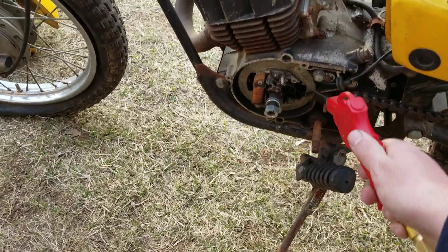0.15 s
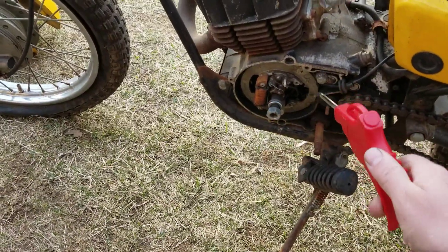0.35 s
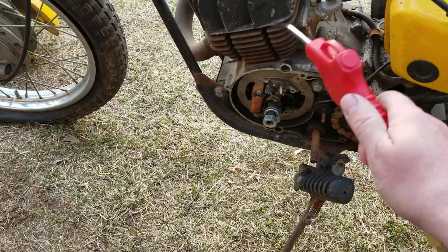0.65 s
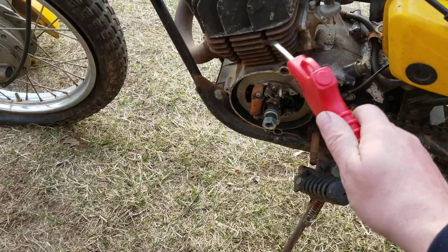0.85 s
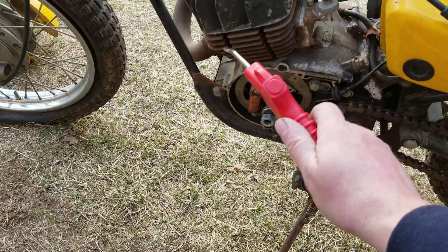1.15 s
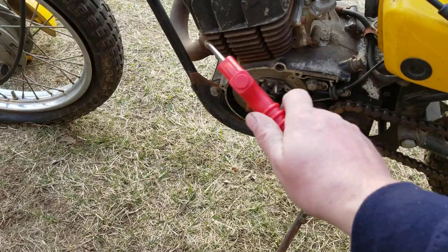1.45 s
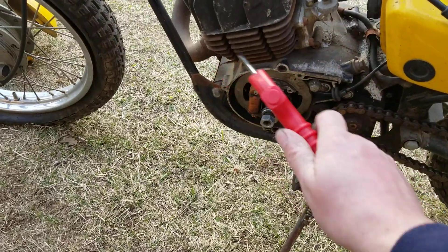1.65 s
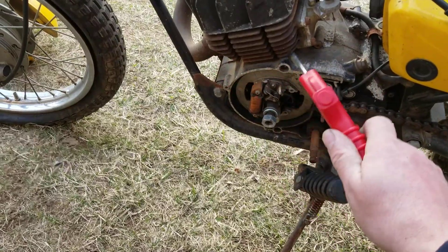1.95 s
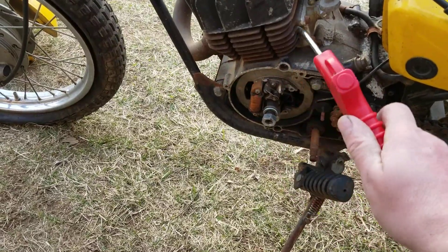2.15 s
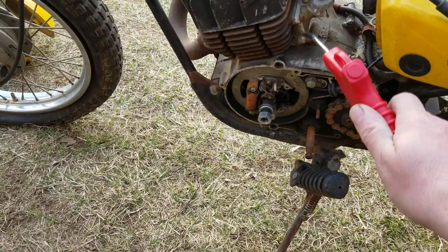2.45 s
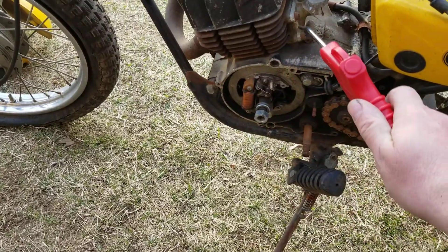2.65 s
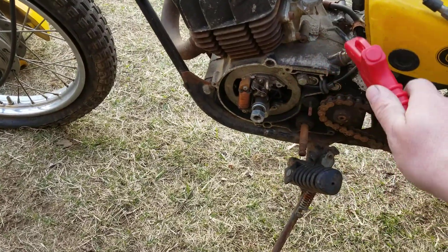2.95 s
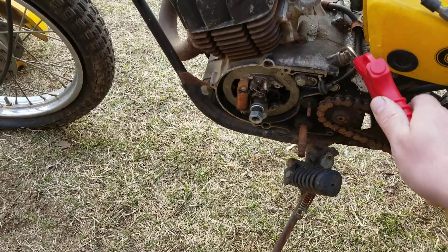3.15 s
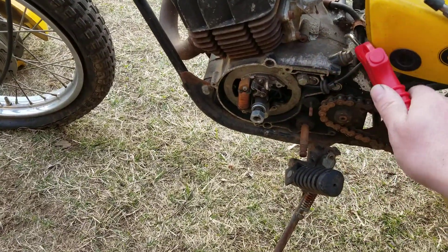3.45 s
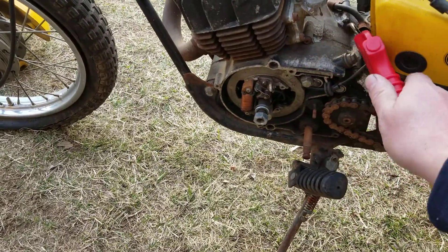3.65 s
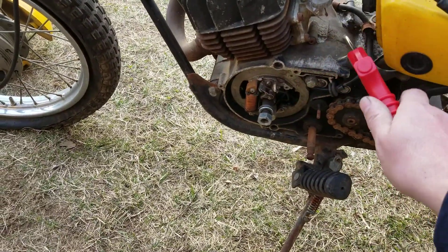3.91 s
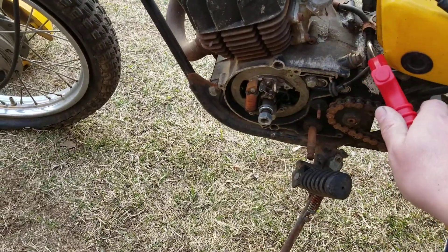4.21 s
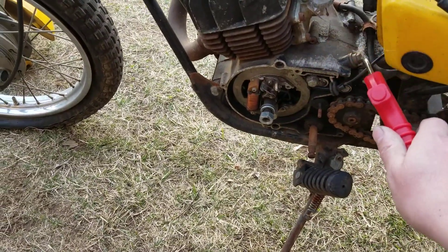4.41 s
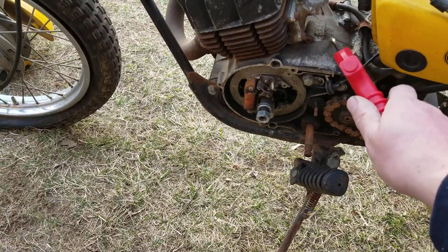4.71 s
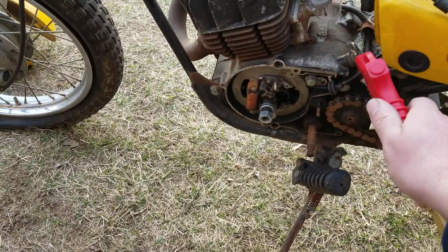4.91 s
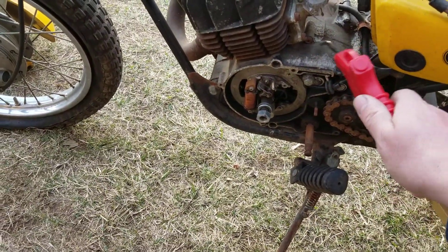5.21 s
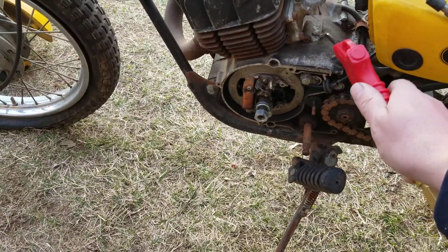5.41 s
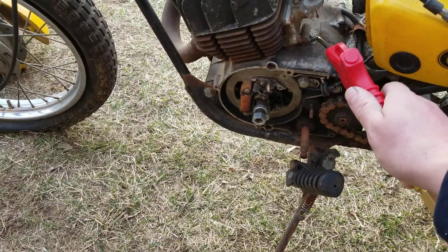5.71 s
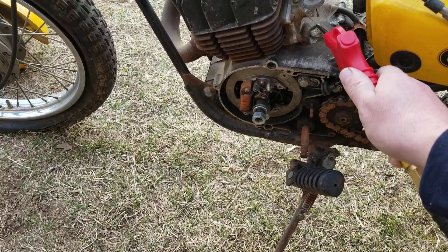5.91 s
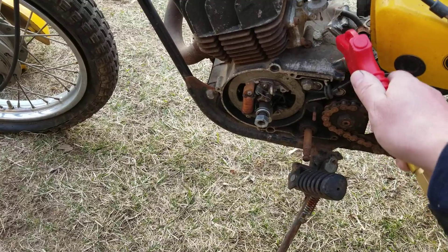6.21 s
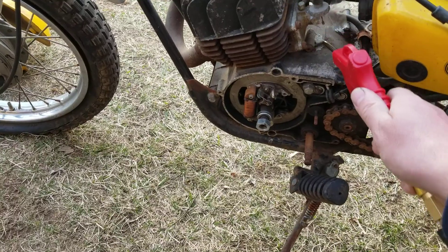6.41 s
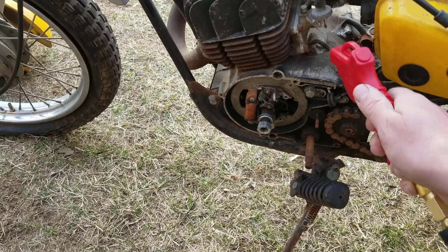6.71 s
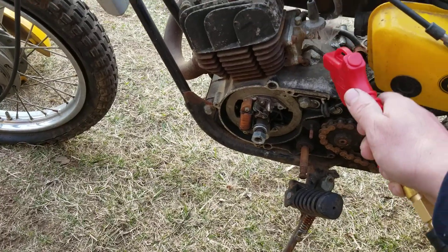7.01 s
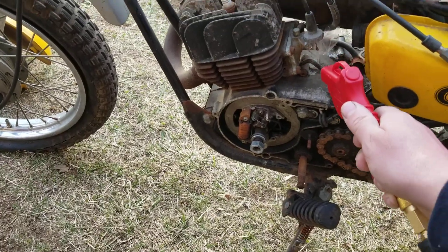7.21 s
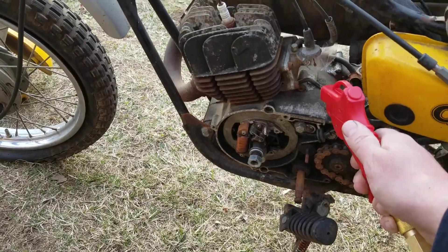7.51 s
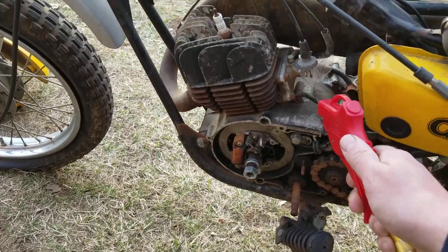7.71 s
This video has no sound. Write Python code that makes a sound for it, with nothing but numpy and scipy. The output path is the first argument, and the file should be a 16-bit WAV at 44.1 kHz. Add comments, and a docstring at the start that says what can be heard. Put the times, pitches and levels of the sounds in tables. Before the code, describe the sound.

A compressed-air blow gun hisses loudly in three blasts over a small metal engine outdoors, with two brief pauses, trigger ticks and fluttering air puffs.

```python
"""A blast of compressed air is already hissing; a short pause and two longer blasts follow, outdoors.
A hand-held blow gun sweeps a small engine near a camera with two microphone ports. Shaped noise makes the
hiss, the roar where air splashes on metal, the singing in pockets between fins and a low hollow boom.
Stray air puffs and thumps on the ports; in the pauses the trigger ticks over a faint yard rumble.
Decaying noise makes faint echoes of the gun."""
import sys
import numpy as np
from scipy import signal
from scipy.fft import rfft, irfft
from scipy.io import wavfile
from scipy.ndimage import uniform_filter1d

SR = 44100
rng = np.random.default_rng(int(sys.argv[2]) if len(sys.argv) > 2 else 0)


def generate_wav(signal):
    """Clip the signal to [-1, 1] and save it as 16-bit WAV at the path in sys.argv[1]."""
    frames = np.transpose(np.atleast_2d(signal))
    scaled = np.clip(frames, -1, 1) * 32767
    pcm = np.round(scaled).astype(np.int16)
    wavfile.write(sys.argv[1], SR, pcm)


N = 346626

# The valve, one row a blast: [fully open t/s, rise dB/s, shuts t/s, quick fall dB/s, slow drain starts at level/dB]
VALVE_MOVES = [(-.1, 3001, 0.2458, 2002.5, -30.5), (0.584, 3506, 3.104, 2200, -26),
               (3.492, 2301, 8.0, 2000, -23.5)]
# Where the nozzle points: [t/s, hiss level/dB, roar level/dB, roar pitch f/Hz, low body of the roar level/dB,
# pocket level/dB, pocket pitch f/Hz, hiss left-right level/dB, left port hears it later by t/us]
NOZZLE_AIM = [(0.0, -23, -28.5, 1930, -12, -36, 3330, 0.5, 108),
              (0.24, -25.5, -33, 1870, -10.5, -28.5, 3820, -1, 87),
              (0.601, -25.5, -33, 2360, -16, -39, 3310, 0.3, 32),
              (1.1, -24.5, -35, 2320, -7, -34.5, 3450, 2, 24),
              (1.45, -27, -40.5, 2190, -3, -36.5, 3600, 1.5, 20),
              (1.75, -21, -37.5, 2140, -14, -34.5, 3820, 0.5, 46),
              (2.3, -21, -33.5, 2250, -9.5, -35, 3300, -0.2, 67),
              (2.65, -20.5, -36.5, 2260, 1, -33.5, 3730, 0, 60),
              (2.9, -24.5, -41.5, 2050, -1, -40, 3480, 1.5, 87),
              (3.09, -24, -41.5, 2050, -6.2, -34, 4080, 2, 102),
              (3.5, -23.5, -46.5, 2070, 5.5, -37.5, 4400, 2.6, 122),
              (4.25, -22.5, -43, 2210, 15, -28.5, 3980, 2, 140),
              (4.8, -25.5, -38, 2080, 2, -32, 4260, 2, 111), (5.22, -24.5, -37, 2120, 4, -37, 4400, 2, 105),
              (5.34, -24, -37.5, 2080, 4, -36.5, 3460, 1.5, 71),
              (5.6, -27, -35.5, 2100, 1.5, -37.5, 3630, 0.8, 76),
              (6.2, -23.5, -34, 2020, 1, -35.5, 3600, 0, 91),
              (6.28, -24, -33.5, 1920, -2.5, -35, 3580, 0, 97),
              (6.93, -24.5, -34, 2170, 1, -36, 3553, 1, 104),
              (7.03, -22.5, -26.5, 2150, -6.5, -26.5, 3750, -0.2, 80),
              (7.4, -24, -28, 2190, -3.5, -26.5, 3830, 0, 80),
              (7.55, -20, -28.5, 2280, -8.5, -29.5, 3800, 0.8, 62),
              (7.86, -24, -33.5, 2290, -4, -35.5, 3800, 1, 67.02)]
# Slow colour of the jet: [t/s, lower hiss level/dB, boom level/dB, roar left-right level/dB]
JET_COLOUR = [(0.0, 1.2, -66, -1), (0.75, 1.5, -70, -2), (1.3, -3, -68, 2), (2.0, 2, -68, -2.5),
              (2.9, -2, -68.5, 1), (3.6, 0.9, -65, 2), (4.6, -1.7, -71, -0.5), (5.2, -2.5, -59, 0),
              (5.8, -0.3, -54.5, -0.5), (6.5, -0.5, -61, 0.5), (7.0, -3.5, -59, -1.5), (7.4, -3.5, -60, 0),
              (7.86, 3, -61, 1.5)]
# The jet sweeps over a face or a gap, so its layers swell or dip:
# [middle t/s, length t/s, hiss change level/dB, roar change level/dB, pocket change level/dB]
JET_SWEEPS = [(0.205, 0.041, 2, 7.5, -3.5), (0.695, 0.035, 4.5, -7, 9), (0.727, .03, -3.5, -8, -1),
              (0.752, 0.037, 3.5, -7, 6), (0.828, 0.071, 3, -3, 3), (0.998, 0.062, 3, -2, 1.5),
              (1.557, 0.12, -0.5, 8, 5), (1.65, 0.029, -3, 1, -5), (1.71, 0.035, -1, -1, 1.5),
              (1.79, 0.083, 2.5, 7, 2.5), (1.902, 0.019, 2.5, 10.5, 4), (2.106, 0.11, -0.3, 1.5, 4),
              (2.25, 0.084, -1, 4.5, 3), (2.388, 0.05, -3.5, 0, -1), (2.807, .05, 2.5, 4.5, 1.5),
              (2.982, 0.13, 2.5, 6.5, 2), (3.57, 0.079, 3.5, 5.5, 1), (3.714, 0.054, -1, 3, -4),
              (4.027, 0.06, -0.8, 0.5, -5), (4.088, 0.038, -3.5, -10, 2), (4.416, 0.11, -2.5, -3, 0),
              (4.624, .17, 6, -0.5, 1), (4.849, 0.075, 1.7, -3.5, -9.5), (4.974, 0.07, 1.2, -5, 8.5),
              (5.09, .06, -0.3, -3, -1), (5.186, 0.074, 1.5, -3, 9.5), (5.35, 0.045, -3, -3.5, -5),
              (5.427, 0.061, 0, 0, 7), (6.312, 0.085, -2, 1.5, 4.5), (6.688, 0.039, -2, 0.5, -5),
              (6.777, 0.054, 5, 1.2, 2.5), (6.782, 0.13, 0.3, 1.5, 5), (7.174, 0.12, 4, 1, 0),
              (7.487, .04, 4, 2, 1)]
# The jet crosses an edge and flares: [start t/s, level/dB before an 11 dB cut, pitch f/Hz, length t/s]
EDGE_FLARES = [(0.687, -8, 3630, 0.038), (0.746, -6, 3720, 0.017), (1.694, -13.5, 3020, 0.013),
               (2.092, -15, 2970, 0.015), (2.24, -16, 3090, 0.024), (5.39, -17, 3260, 0.015),
               (7.14, -28, 2520, 0.015), (7.303, -16, 2440, 0.031), (7.566, -7, 2520, 0.018),
               (7.609, -12.5, 2510, 0.025)]
# Colour of the hiss: [f/Hz, level/dB]
HISS_SPECTRUM = [(150, -20.5), (800, -19), (2500, -11.5), (4800, -1.5), (6500, -5), (8000, -5.5),
                 (10800, -4), (13400, -7), (15400, -0.5), (17000, -8)]
# Colour of the roar: [share of the roar pitch, level/dB]
ROAR_SPECTRUM = [(.2, -36.5), (.45, -12.5), (.6, -7.5), (.8, -6), (1.0, -6.5), (1.2, -5), (1.6, -15.5),
                 (2.5, -17.5), (4.5, -33.5)]
# The camera body shades each port: [f/Hz, left-right level/dB]
PORT_SHADING = [(400, -0.5), (800, 2.5), (1200, 6.5), (2000, 9.5), (2600, 11.5), (3500, 7.5), (4300, 3.5),
                (5200, -3), (7300, -6), (8500, -7), (10300, 2), (12000, -7), (13300, -9), (15500, 1)]
# Narrow dips in the jet's sound on each port: [f/Hz, half width f/Hz, left level/dB, right level/dB]
NARROW_DIPS = [(2800, 110, -6, -2), (3700, 90, -3, -1), (4500, 100, -4, -4), (5620, 90, -6, -7),
               (6650, 120, -2, -4)]
# How alike the jet sounds on both ports: [f/Hz, likeness 0-1]
PORT_LIKENESS = [(300, 0.8), (600, .6), (1200, 0.93), (2200, 0.57), (3000, 0.41), (6000, 0.46),
                 (10000, 0.41), (15000, 0.24)]
# Sound bends round the camera body: [f/Hz, extra phase between the ports/rad]
BODY_BEND = [(300, -.1), (1100, -.7), (1500, -0.5), (2100, 0.4), (2700, 0.1), (3400, 0.2), (4500, 0.7),
             (5600, 0.5), (7000, -0.2)]
# Gusts on the ports, a puff with a swell or dip of stray air: [start t/s, puff level/dB,
# left-right level/dB (cuts the weaker port), puff length t/s, swell level/dB, swell length t/s]
PORT_PUFFS = [(0.027, -52, 8, .03, 6, .14), (0.621, -38, -20, 0.029, -16, 0.16),
              (0.797, -36, 7, 0.018, 12.5, 0.083), (0.985, -31, 9.5, 0.012, 13.5, 0.078),
              (1.141, -33.5, 19, 0.037, 20.5, 0.066), (1.316, -39, 13.5, 0.027, 12.5, 0.1),
              (1.49, -36, 15, 0.026, 14, 0.11), (1.604, -37, 14, 0.019, 13, 0.058),
              (1.697, -39, -13, 0.033, -7, .05), (1.845, -43, 6, .03, 11.5, 0.14),
              (2.12, -38, 7, 0.019, 1, .05), (2.278, -28.5, 19, 0.017, 9.5, 0.078),
              (2.474, -41, 13, 0.027, 17.5, 0.11), (2.607, -45, 8, .03, 17.5, .12),
              (2.803, -36, -6, 0.023, 22.5, 0.048), (2.925, -37, 15.0, 0.054, 14.5, 0.14),
              (3.517, -34.5, 19, 0.038, 13.5, .11), (3.986, -33.5, 11, 0.031, 8, 0.059),
              (4.129, -32.5, 22, 0.023, -12, .05), (4.563, -46, 5, 0.03, 18.5, .15),
              (4.85, -30.5, 22, 0.022, -2.5, 0.053), (5.305, -23, 21, 0.016, 21, 0.04),
              (5.395, -53, 8, .03, 3.5, .07), (5.73, -52, 8, .03, 9.5, 0.13),
              (6.079, -33, 6, 0.018, 20, .06), (6.137, -27, 37, 0.02, 14, 0.079),
              (6.448, -44, 4, 0.026, 13.5, 0.077), (6.747, -34, 3, 0.032, 10, 0.097),
              (6.889, -37, 16, 0.027, 3, .05), (7.121, -38, -1, 0.03, 10.5, 0.14),
              (7.459, -33, 8, 0.026, 16.5, 0.067)]
# Colour of the stray air: [f/Hz, level/dB]
STRAY_SPECTRUM = [(20, -40.5), (40, -8), (65, -10.5), (200, -4.5), (400, -8.5), (900, -4), (2000, -20.5)]
# Colour of the yard rumble: [f/Hz, level/dB]
YARD_SPECTRUM = [(24, -30.5), (40, 6.5), (114, -2), (183, -17.5), (287, -12), (509, -45), (2160, -38),
                 (3000, -45), (6000, -57.5), (15500, -52.5)]
# Trigger ticks: [t/s, level/dB, share of the spring modes 0-1]
TRIGGER_TICKS = [(3.207, -58, 1), (3.231, -60.5, 1), (3.439, -52.5, 0.03)]
# Ringing of the trigger, two body modes then two spring modes: [f/Hz, level/dB, time to fall 60 dB t/s]
TRIGGER_MODES = [(1460, 0, .03), (2700, -17, .025), (2200, -8, .008), (4520, 0, .022)]
# How long outdoor echoes last: [f/Hz, time to fall 60 dB t/s]
ECHO_DECAY = [(500, .4), (2000, 0.6), (4000, 0.57), (7000, 0.45), (15000, .35)]

SIZE, HOP = 512, 128  # noise frames, in samples
FRAME_T = np.arange(N // HOP + 5) * HOP / SR  # s
F = np.fft.rfftfreq(SIZE, 1 / SR)[:, None]  # Hz, one row a bin
FRAMES, BINS = len(FRAME_T), len(F)
EDGE_S = 0.008  # soft edges of a sweep or gust
WOBBLE_DB, FLUTTER_DB = 0.81, 1.0  # chance wobble of each layer; flapping of the whole jet
PATCHY_DB, RIDGED_DB = 1.0, 1.5  # depth of short patches and of long thin ridges in the jet
BODY_PER_DB, LOWER_PER_DB = 0.58, 0.74  # roar deepens as it swells; lower hiss follows the pocket
BOOM_HZ, BOOM_WIDE_HZ = 350, 70
STRAY_DB, LUMPS_DB = -53, 5.37  # steady stray air on each port; its chance lumps
SHELTER, GUST_HZ = 0.63, 890  # share of a gust's dB on the right port; gusts swell mostly below GUST_HZ


def gain_of(db):
    """Turns dB into a gain."""
    return 10 ** (np.asarray(db) / 20)


def evened(x):
    """Scales a signal to an rms (average strength) of 1."""
    return x / np.sqrt(np.mean(abs(x) ** 2) + 1e-20)


def read(points, hz):
    """Reads a table smoothly over log frequency."""
    f, value = np.transpose(points)
    return np.interp(np.log(hz + 1), np.log(f + 1), value)


def over_time(table):
    """Draws each column of a timed table as a line over the frames."""
    t, *columns = np.transpose(table)
    return [np.interp(FRAME_T, t, column) for column in columns]


def unit(shape):
    """Scales each spectrum (bins x frames) so that its noise has rms 1."""
    return shape / np.sqrt(np.mean(shape ** 2, axis=0) + 1e-20)


def peak(at_hz, wide_hz, power=2):
    """A bell over frequency, half height at wide_hz from its middle."""
    return 1 / (1 + ((F - at_hz) / wide_hz) ** power)


def drift(bins, long, wide):
    """Random patches, long frames by wide bins, rms 1."""
    field = rng.standard_normal((bins, FRAMES))
    field = uniform_filter1d(field, long, axis=1)
    return evened(uniform_filter1d(field, wide, axis=0))


def noise(shape, same=0.0, turn=0.0):
    """Two-port noise from magnitudes (ports x bins x frames), with a likeness and a phase between ports."""
    a, b, c, d = rng.standard_normal((4,) + shape.shape[1:])
    same = np.clip(same, 0, 1)
    left, other = a + 1j * b, c + 1j * d
    right = (same * left + np.sqrt(1 - same ** 2) * other) * np.exp(1j * turn)
    scale = np.sqrt(3 / (4 * SIZE))  # evens out the overlapping frames
    spectra = np.array([left, right]) * shape * scale
    return signal.istft(spectra, nperseg=SIZE, noverlap=SIZE - HOP)[1][:, :N] * np.sqrt(2)


def bumps(start, length, rise):
    """One soft bump an event (events x frames): quick rise, then a bell-shaped fall."""
    since = np.maximum(FRAME_T - start[:, None], 0)
    fall = np.exp(-(since / np.maximum(length, 0.004)[:, None]) ** 2)
    return (1 - np.exp(-since / rise)) * fall


def spans(start, length):
    """One soft-edged window an event (events x frames)."""
    enter = np.tanh((FRAME_T - start[:, None]) / EDGE_S)
    leave = np.tanh((FRAME_T - (start + length)[:, None]) / EDGE_S)
    return (enter - leave) / 2


def valve(drain_db_per_s=300):
    """The flow climbs as the valve opens; when it shuts, it drops and the barrel drains."""
    t = np.arange(N) / SR
    flow = np.zeros(N)
    for opens, rise, shuts, fall, drain_db in VALVE_MOVES:
        after = np.maximum(t - shuts, 0)
        opening = gain_of(np.minimum(0, (t - opens) * rise))
        closing = gain_of(-after * fall) + gain_of(drain_db - after * drain_db_per_s)
        flow += opening * closing
    return flow


def hiss(level_db, lower_db):
    """The rushing jet: broad noise with a movable lower part and a peak at 11 kHz."""
    lower = lower_db / (1 + (F / 9300) ** 6)
    upper = 3.44 * peak(11000, 1200)
    return unit(gain_of(read(HISS_SPECTRUM, F) + lower + upper)) * gain_of(level_db)


def roar(level_db, pitch_hz, body_db):
    """Air splashing on metal: noise around a moving pitch, with more or less low body."""
    colour = np.interp(F / pitch_hz, *np.transpose(ROAR_SPECTRUM))
    body = body_db / (1 + (F / pitch_hz / 0.81) ** 8)
    return unit(gain_of(colour + 2.5 * peak(pitch_hz, 310) + body)) * gain_of(level_db)


def pocket(level_db, pitch_hz):
    """Pockets between fins sing: a broad band of noise with a narrow peak at one pitch."""
    return unit(peak(pitch_hz, 1000, 4) + 0.62 * peak(pitch_hz, 50)) * gain_of(level_db)


def boom(level_db):
    """A low hollow band of noise."""
    return unit(peak(BOOM_HZ, BOOM_WIDE_HZ)) * gain_of(level_db)


def flares():
    """The jet crosses an edge: brief bands of noise, each at its own pitch."""
    start, level_db, pitch_hz, length = np.transpose(EDGE_FLARES)
    bands = unit(peak(pitch_hz, 300)) * gain_of(level_db - 11)
    return np.sqrt(bands ** 2 @ bumps(start, length, 0.004) ** 2)


def shaded_by_camera(jet, hiss_pan_db, roar_pan_db):
    """The camera body tilts the jet between the ports; narrow dips at fixed pitches and random patches roughen
    it."""
    dips_db = 0
    for at_hz, wide_hz, *sides_db in NARROW_DIPS:
        dips_db = dips_db + np.reshape(sides_db, (2, 1, 1)) * peak(at_hz, wide_hz)
    high = 1 / (1 + (2500 / (F + 1)) ** 4)
    tilt_db = read(PORT_SHADING, F) + high * hiss_pan_db + (1 - high) * roar_pan_db
    patches_db = np.array([PATCHY_DB * drift(BINS, 30, 7) + RIDGED_DB * drift(BINS, 120, 3)
                           for _ in range(2)])
    return jet * gain_of(patches_db + dips_db + np.array([tilt_db, -tilt_db]) / 2)


def air_jet():
    """The aim, colour and sweeps steer the layers; their powers add, and the valve gates the sum."""
    hiss_db, roar_db, roar_hz, body_db, pocket_db, pocket_hz, hiss_pan_db, lag_us = over_time(NOZZLE_AIM)
    lower_db, boom_db, roar_pan_db = over_time(JET_COLOUR)
    middle, length, *changes_db = np.transpose(JET_SWEEPS)
    sweeps_db = np.array(changes_db) @ spans(middle - length / 2, length)
    hiss_up, roar_up, pocket_up = sweeps_db + WOBBLE_DB * drift(3, 16, 1)
    hiss_db = hiss_db + hiss_up
    roar_db = roar_db + roar_up
    pocket_db = pocket_db + pocket_up
    body_db = body_db + BODY_PER_DB * roar_up
    lower_db = lower_db + LOWER_PER_DB * (pocket_db - hiss_db + 9.5)
    layers = [hiss(hiss_db, lower_db), roar(roar_db, roar_hz, body_db), pocket(pocket_db, pocket_hz),
              boom(boom_db), flares()]
    jet = np.sqrt(sum(layer ** 2 for layer in layers))
    jet = jet * gain_of(FLUTTER_DB * drift(1, 4, 1)[0])  # the jet flaps over the fins
    ports = shaded_by_camera(jet, hiss_pan_db, roar_pan_db)
    turn = 2 * np.pi * F * lag_us / 10 ** 6 + read(BODY_BEND, F)
    return valve() * noise(ports, read(PORT_LIKENESS, F), turn)


def stray_air():
    """Stray air on each port: lumpy noise that swells or dips, with puffs of deeper noise."""
    start, puff_db, side_db, length, swell_db, swell_s = np.transpose(PORT_PUFFS)
    sides_db = puff_db + np.minimum(0, [side_db, -side_db])
    puff_power = gain_of(sides_db) ** 2 @ bumps(start, length, 0.017) ** 2
    gust_db = swell_db @ spans(start - 0.015, swell_s) / (1 + (F / GUST_HZ) ** 4)
    ports_db = STRAY_DB + np.array([gust_db, SHELTER * gust_db])
    lumps = gain_of(ports_db + LUMPS_DB * drift(2, 9, 1)[:, None])
    steady = unit(gain_of(read(STRAY_SPECTRUM, F))) * lumps
    # big eddies thump lower
    deep = unit(gain_of(read(STRAY_SPECTRUM, F) - 9.1 * np.log2(1 + F / 50)))
    return valve() * noise(np.sqrt(steady ** 2 + deep ** 2 * puff_power[:, None]), 0.15)


def yard(level_db=-68):
    """A faint far rumble of shaped noise, nearly alike on both ports."""
    hz = np.fft.rfftfreq(N, 1 / SR)
    colour = gain_of(read(YARD_SPECTRUM, hz))
    shared, left, right = (irfft(rfft(v) * colour, N) for v in rng.standard_normal((3, N)))
    return gain_of(level_db) * evened(np.array([shared + 0.4 * left, shared + 0.3 * right]))


def membrane_thumps():
    """Each puff pushes the membrane once: a short 62 Hz swing under a bell-shaped swell."""
    out, t = np.zeros((2, N)), np.arange(6000) / SR
    phases = rng.uniform(0, 2 * np.pi, (len(PORT_PUFFS), 2, 1))
    for (start, puff_db, side_db, length, *_), phase in zip(PORT_PUFFS, phases):
        push = np.exp(-((t - length) / (0.45 * length)) ** 2)
        swing = push * np.cos(2 * np.pi * 62 * t + phase)
        sides_db = puff_db - 3.5 + np.minimum(0, [[side_db], [-side_db]])
        part = out[:, round(start * SR):][:, :len(t)]
        part += gain_of(sides_db) * swing[:, :part.shape[1]]
    return out


def trigger():
    """Small rough plastic ticks: a fading scrape rings the body or spring modes, plus a duller scrape."""
    out, t = np.zeros(N), np.arange(3000) / SR
    band = signal.butter(2, [1100, 4500], "bandpass", fs=SR, output="sos")
    for start, level_db, spring in TRIGGER_TICKS:
        shares = np.clip([1 - spring, 1 - spring, spring, spring], 0, 1)
        ring = np.zeros(len(t))
        for share, (hz, db, t60) in zip(shares, TRIGGER_MODES):
            ring += share * gain_of(db - 60 * t / t60) * np.sin(2 * np.pi * hz * t)
        scrape = rng.standard_normal(len(t)) * gain_of(-60 * t / 0.036)
        rough = signal.fftconvolve(ring, scrape)[:len(t)]
        dull = signal.sosfilt(band, scrape)
        out[round(start * SR):][:len(t)] += gain_of(level_db) * (rough / abs(rough).max() + 0.3 * dull)
    return out


def outdoors(x, delay_s=0.012):
    """Scattered echoes from ground, sheds and trees: noise whose bands each die at their own speed."""
    hz, t, z = signal.stft(rng.standard_normal((2, SR)), SR, nperseg=256)
    fading = gain_of(-60 * t / read(ECHO_DECAY, hz)[:, None])
    tail = signal.istft(z * fading, SR, nperseg=256)[1]
    tail = np.pad(tail, ((0, 0), (round(delay_s * SR), 0)))
    return signal.fftconvolve(x, tail / np.linalg.norm(tail[0]), axes=1)[:, :N]


def scene():
    """Adds the gun, its echoes, stray air, membrane thumps and yard."""
    gun = air_jet() + trigger()
    echoes = gain_of(-40) * outdoors(gun)
    return gun + echoes + stray_air() + membrane_thumps() + yard()


def record(dry):
    """Cuts the lows under 40 Hz, then everything above a steep edge at 15770 Hz."""
    low_cut = signal.butter(2, 40, "highpass", fs=SR, output="sos")
    band_limit = signal.firwin(1023, 15770, window=("kaiser", 7), fs=SR)
    return signal.oaconvolve(signal.sosfilt(low_cut, dry), band_limit[None], "same")


dry = scene()
out = record(dry)
generate_wav(out)
```